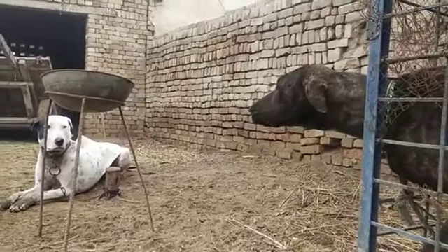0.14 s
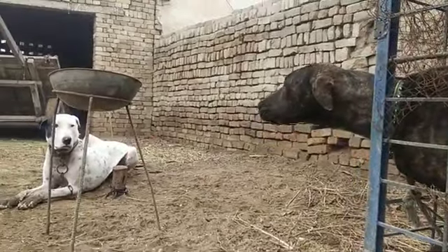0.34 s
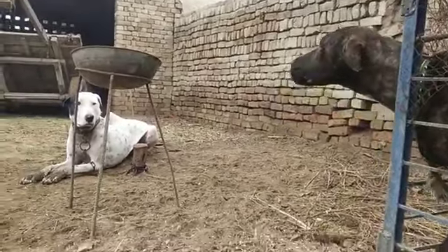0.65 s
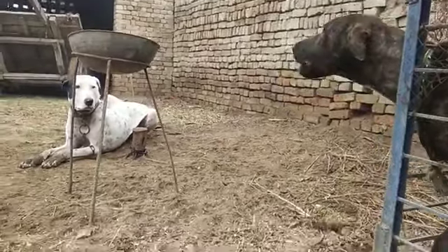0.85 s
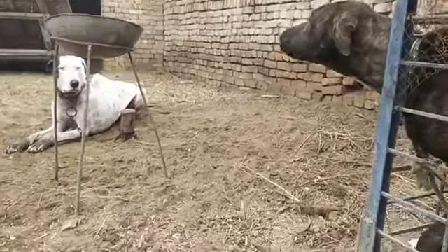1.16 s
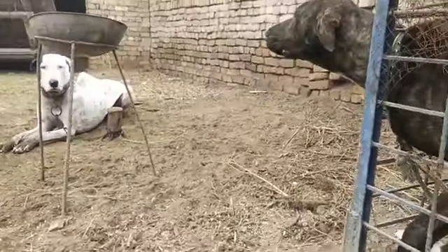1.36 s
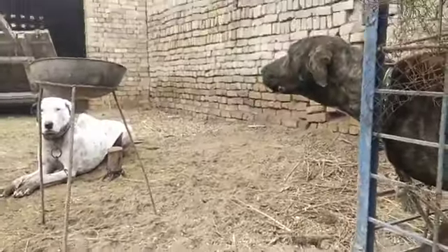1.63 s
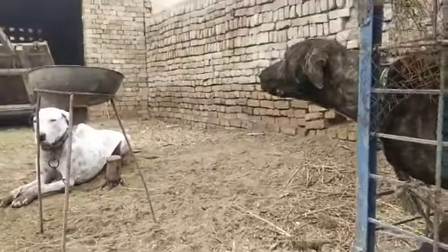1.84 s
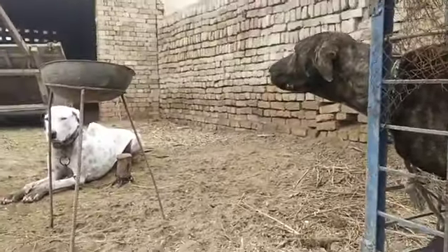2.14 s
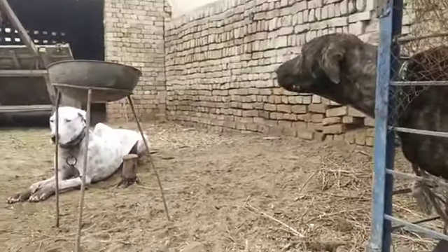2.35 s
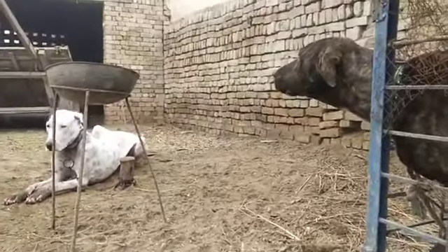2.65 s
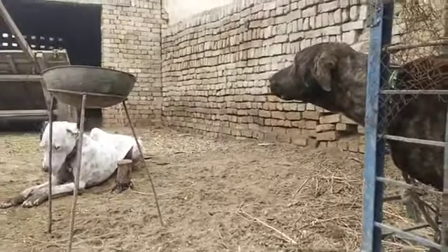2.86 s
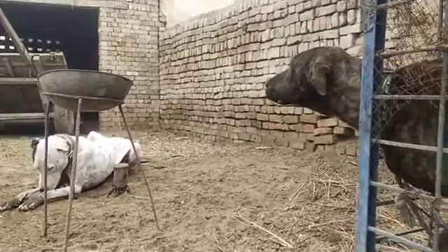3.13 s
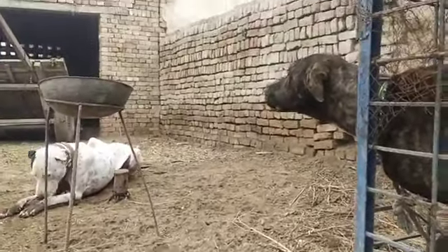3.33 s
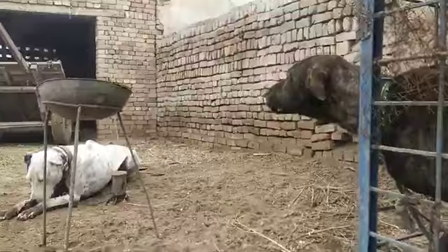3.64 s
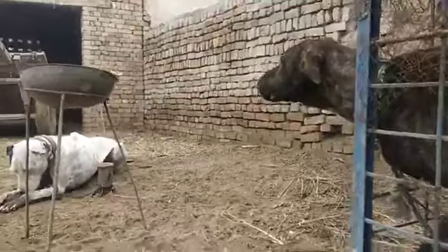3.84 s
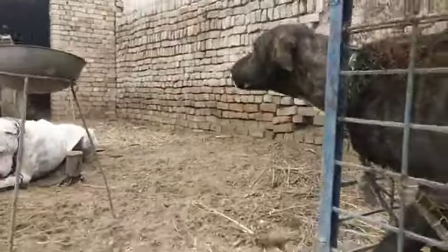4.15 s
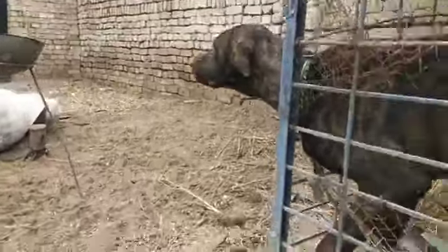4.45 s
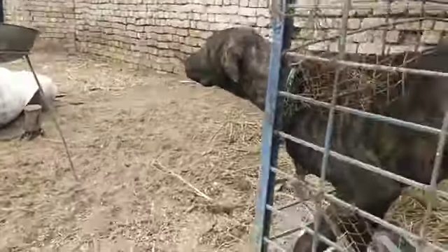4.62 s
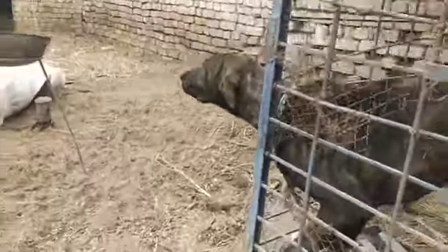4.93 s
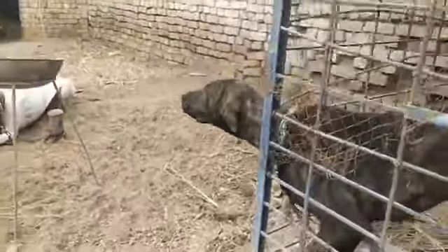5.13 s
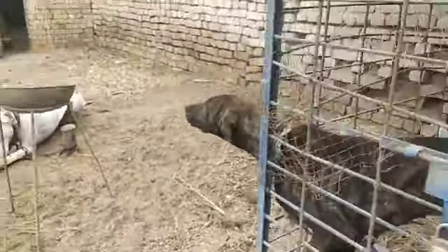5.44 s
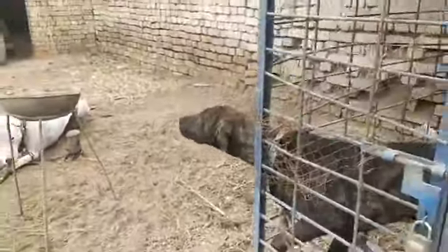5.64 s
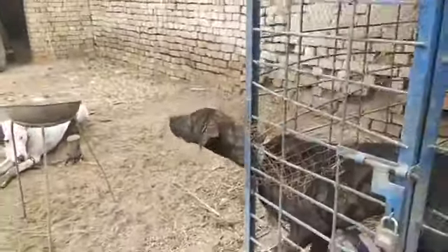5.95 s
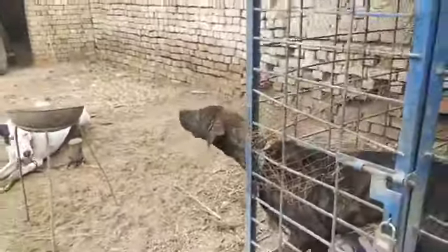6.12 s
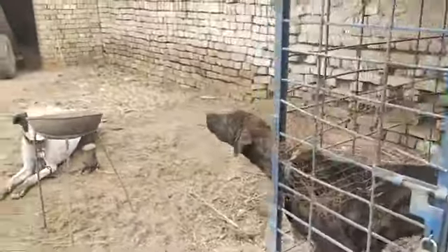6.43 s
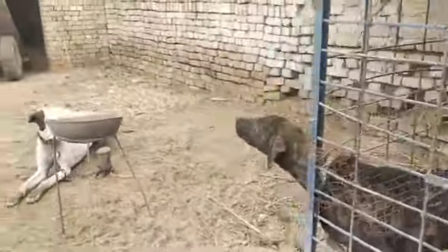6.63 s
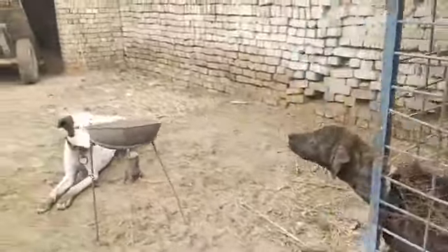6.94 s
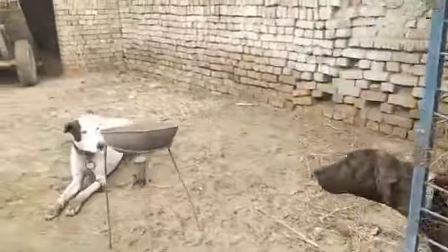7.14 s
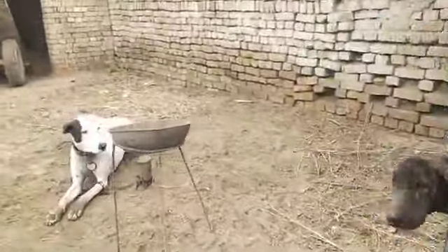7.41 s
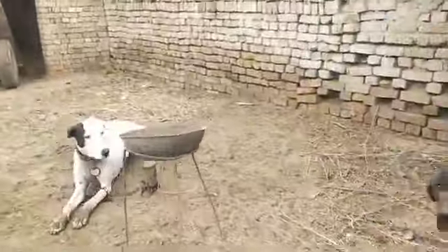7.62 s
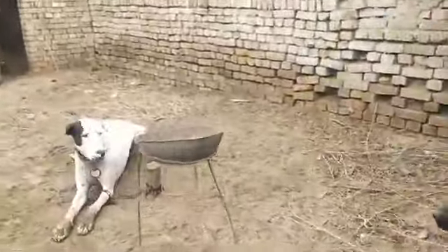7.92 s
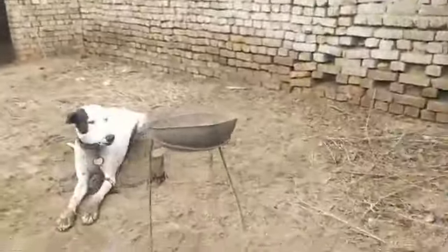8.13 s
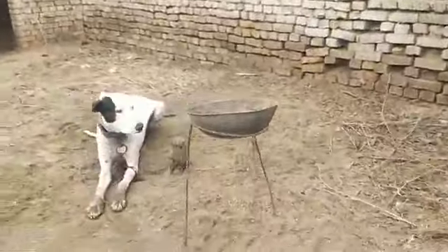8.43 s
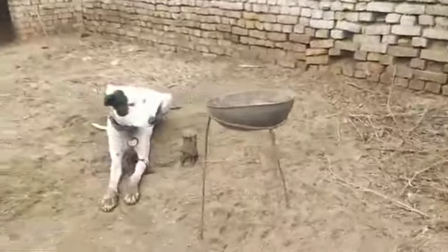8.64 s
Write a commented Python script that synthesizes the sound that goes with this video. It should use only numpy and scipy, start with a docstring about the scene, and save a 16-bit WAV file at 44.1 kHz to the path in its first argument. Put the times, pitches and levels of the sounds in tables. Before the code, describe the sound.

A big dog gives five deep rattling growls in a brick yard while someone shifts on dry straw and a crow caws beyond.

```python
"""A low, rattling growl opens at once: a big dog growls five times in a brick yard, the third time longest.
Each growl is a train of uneven vocal-fold pulses filtered by throat, mouth and muzzle, with slaps of loose flesh.
Someone close by shifts about on dry straw: swelling noise for the clothes, decaying crackles for the feet.
Beyond the wall a crow caws and small birds whistle, as frequency-modulated tones; a faint rattle of
resonant clicks comes near the end. Shaped noise is the air, and decaying noise the echo of the walls."""
import sys
import numpy as np
from scipy import signal
from scipy.fft import rfft, irfft, next_fast_len
from scipy.io import wavfile
from scipy.ndimage import uniform_filter1d

SR = 44100
rng = np.random.default_rng(int(sys.argv[2]) if len(sys.argv) > 2 else 0)


def transcribe(signal):
    """Save signal, clipped to [-1, 1], as a 16-bit WAV file at the path in sys.argv[1]."""
    frames = np.atleast_2d(signal).T
    limited = np.clip(frames, -1, 1)
    pcm = np.round(limited * 32767).astype(np.int16)
    wavfile.write(sys.argv[1], SR, pcm)


N = 387051
TIME = np.arange(N) / SR


def from_db(db):
    """Amplitude ratio: 20 dB is a factor of ten."""
    return 10 ** (np.asarray(db) / 20)


def rms_one(x):
    """Normalisation to unit effective value."""
    return x / np.sqrt(np.mean(x ** 2) + 1e-20)


def cut(x, hz, kind, order=4):
    """Butterworth filtering: a maximally flat pass band."""
    return signal.sosfilt(signal.butter(order, hz, kind, fs=SR, output="sos"), x + 1e-18)


def colour(x, points, causal=True):
    """Spectral shaping by (Hz, dB) points: minimum-phase, or else symmetric in time."""
    size = 2 * next_fast_len(x.shape[-1] // 2 + 4096)
    hz, db = np.transpose(points)
    log_hz = np.log2(np.maximum(np.arange(size // 2 + 1) * SR / size, 1))
    octaves_outside = np.abs(log_hz - np.clip(log_hz, np.log2(hz[0]), np.log2(hz[-1])))
    # past both ends it falls by 24 dB per octave, for two octaves
    gain = from_db(np.interp(log_hz, np.log2(hz), db) - 24 * np.minimum(octaves_outside, 2))
    if causal:
        # folding the cepstrum gives the minimum-phase response
        cepstrum = irfft(np.log(gain))[:size // 2]
        cepstrum[1:] *= 2
        gain = np.exp(rfft(cepstrum, size))
    return irfft(rfft(x, size) * gain)[..., :x.shape[-1]]


def resonance(x, hz, width):
    """Heterodyning: a steep-sided resonance of gain 1 whose centre may move."""
    turn = np.exp(2j * np.pi * np.cumsum(hz * np.ones(len(x))) / SR)
    return 2 * np.real(turn * cut(x / turn, width / 2, "low", order=2))


def curves(rows, t):
    """Linear interpolation of a table's columns at the times t."""
    s, *columns = np.transpose(rows)
    return [np.interp(t, s, c) for c in columns]


def drift(rate, t):
    """Band-limited randomness: chance values of unit spread about 0, rate per second, joined by lines."""
    knots = np.arange(t[0], t[-1] + 1, 1 / rate)
    return np.interp(t, knots, rng.standard_normal(len(knots)))


def even(x):
    """Automatic gain: holds the level near 1 over a few cycles, keeping the single pulses."""
    power = uniform_filter1d(uniform_filter1d(x * x, size=1500), size=1000)
    return x / np.sqrt(np.maximum(power, 0) + np.mean(x * x) / 100)


def pan(x, db):
    """Interaural level difference: left over right in dB, with the sum of the ears kept."""
    left = from_db(db)
    return x * np.vstack([left, np.ones_like(left)]) * 2 / (1 + left)


def stereo_noise(count, alike):
    """Interaural coherence: white noise that is partly the same in both ears."""
    mid, side = rng.standard_normal((2, count))
    alike = np.clip(alike, -1, 1)
    return np.sqrt(1 + alike) * mid + np.sqrt(1 - alike) * side * [[1], [-1]]


def add(out, start, x):
    """Superposition: mixes a sound in at its time in seconds."""
    i = max(round(start * SR), 0)
    out[:, i:i + x.shape[-1]] += x[..., :N - i]


def yard(x, wet_db, t60=0.72, bass_db=-6):
    """Reverberation: brick walls scatter a decaying tail, alike in both ears only in the bass."""
    t = TIME[:SR // 2]
    bass = cut(rng.standard_normal(len(t)), 1100, "low", order=2)
    treble = cut(rng.standard_normal((2, len(t))), 360, "high", order=2)
    scatter = from_db(bass_db) * bass + treble
    fade = from_db(-60 * t / t60) * (t > .004)
    tail = scatter * fade / np.sqrt(np.sum(fade ** 2))
    return x + from_db(wet_db) * signal.fftconvolve(x, tail, axes=1)[:, :N]


# Spectrum of the background. Each row: frequency in Hz, relative level in dB.
AIR_TONE = [(25, -18), (50, -13.5), (90, -1), (130, -2), (172, 1.5), (235, -10), (330, -11), (700, -16),
            (1200, -15.5), (2000, -20.5), (3000, -21), (5200, -29), (7000, -32.5), (15000, -38)]
AIR_DB, HANDLING_DB = -64.5, -1   # steady level; dull handling noise relative to the swish strength


def air(swish_level):
    """Diffuse field: village rumble shared by the ears under an unrelated hush, raised by handling noise."""
    rumble = cut(stereo_noise(N, alike=0.91), 650, "low", order=2)
    hush = cut(stereo_noise(N, alike=0.043), 520, "high", order=2)
    noise = rms_one(colour(rumble + pan(hush, db=1.5), AIR_TONE))
    return noise * np.hypot(from_db(AIR_DB), from_db(HANDLING_DB) * swish_level[1])


# Calls of the crow. Each row: start in seconds, end in seconds, level in dB of the voiced part,
# centre in Hz, warbles per second.
CAWS = [(2.767, 3.079, -50, 1787, 77), (3.557, 3.865, -46, 1806, 74), (6.553, 6.851, -52, 1805, 71)]
# Spectrum of a caw. Each row: frequency in Hz, relative level in dB.
CAW_TONE = [(1000, -10), (1400, -4), (1620, 2.5), (1780, -3.5), (1950, 1), (2150, 1), (2500, -15),
            (3200, -40.5)]
# Whistles of small birds. Each row: start in seconds, end in seconds, first pitch in Hz, last pitch in Hz,
# level in dB, random waver in Hz.
WHISTLES = [(2.444, 2.676, 3560, 3330, -73, 70), (3.159, 3.407, 1800, 3550, -70, 20),
            (3.15, 3.244, 1990, 2340, -63.5, 40.5), (3.233, 3.434, 1570, 2704, -58, 11),
            (3.27, 3.678, 1118, 1077, -67.5, 9.3), (3.385, 3.48, 2584, 2610, -67.5, 22),
            (3.884, 4.037, 2490, 2580, -55.5, 67), (4.341, 4.464, 2140, 2830, -56.5, 25),
            (7.772, 8.001, 1392, 2940, -65.5, 12), (7.851, 7.924, 2600, 2670, -60, 120),
            (7.99, 8.052, 2650, 2760, -53.5, 170), (8.196, 8.36, 2650, 2790, -69, 150),
            (8.27, 8.51, 1400, 2690, -71.5, 17)]
CAW_WARBLE_HZ, CAW_ARCH_HZ, CAW_SAG_HZ = 148, 89.9, 92   # fast warble; rise in the middle; fall over the caw
CAW_OVERTONE_HZ, CAW_OVERTONE_GAIN = 389, 0.46   # a slower buzz adds a band above and below
CAW_RASP = 0.28   # hoarse noise relative to the voice


def birds():
    """Frequency modulation: caws arch and turn hoarse from a fast warble; whistles glide and waver."""
    out = np.zeros((2, N))
    for start, end, db, centre_hz, rate in CAWS:
        t = np.arange(start, end, 1 / SR)
        along = np.linspace(0, 1, len(t))
        cycle = 2 * np.pi * np.cumsum(rate * (1 + .03 * drift(60, t))) / SR
        contour = centre_hz + CAW_ARCH_HZ * (np.sin(np.pi * along) - 1) - CAW_SAG_HZ * (along - .5)
        hz = contour + CAW_WARBLE_HZ * signal.sawtooth(cycle, .5) + 25 * drift(201.5, t)
        buzz = 1 + CAW_OVERTONE_GAIN * np.cos(2 * np.pi * CAW_OVERTONE_HZ * t)
        voice = np.sin(2 * np.pi * np.cumsum(hz) / SR) * buzz * (1 + 0.36 * np.sin(cycle))
        rasp = rms_one(colour(rng.standard_normal(len(t)), CAW_TONE))
        caw = rms_one(colour(voice, CAW_TONE)) + CAW_RASP * rasp
        add(out, start, pan(caw * from_db(db) * signal.windows.tukey(len(t), .6), db=12.0))
    for start, end, from_hz, to_hz, db, waver_hz in WHISTLES:
        count = round((end - start) * SR)
        hz = np.linspace(from_hz, to_hz, count) + waver_hz * drift(220, TIME[:count])
        tone = np.sin(2 * np.pi * np.cumsum(hz) / SR)
        add(out, start, pan(tone * from_db(db) * signal.windows.tukey(count, .7), db=15.5))
    return out


# Dry hollow clicks. Each row: time in seconds, peak in dB before panning.
RATTLE = [(8.0716, -54), (8.095, -50), (8.129, -56), (8.1506, -52), (8.188, -48), (8.209, -49),
          (8.4689, -53), (8.4918, -52.5), (8.5272, -56), (8.5497, -48.5), (8.584, -51), (8.607, -50)]
# Spectrum of a click, with two hollow resonances. Each row: frequency in Hz, relative level in dB.
RATTLE_TONE = [(900, -24), (1500, -13), (1820, 0), (2200, -14), (2630, 5), (3200, -13), (4000, -15),
               (5500, -15), (7500, -21.5)]


def rattle(t60=0.038, grit=0.19):
    """Impulse excitation: small dry clicks ring in two hollow resonances."""
    out, t = np.zeros((2, N)), TIME[:SR // 20]
    for s, db in RATTLE:
        rough = grit * rng.standard_normal(len(t)) * from_db(-60 * t / t60)
        click = colour(signal.unit_impulse(len(t)) + rough, RATTLE_TONE)
        add(out, s, pan(click / np.abs(click).max() * from_db(db), db=19.0))
    return out


# Movements of the clothes. Each row: peak time in seconds, swell in seconds, fade in seconds,
# relative swish level in dB, relative hiss level in dB, left over right in dB.
MOVES = [(.65, 0.054, 0.33, -53.5, -66, 11), (.97, 0.27, 0.23, -61, -56.5, 9.5),
         (1.54, 0.77, 0.49, -56, -55, 13.5), (1.84, 0.33, 0.46, -53, -81, 16.5),
         (2.459, 0.023, 0.045, -60, -67, 18), (3.99, 0.5, .16, -53.5, -89.5, 9),
         (4.05, 0.13, 0.53, -46.5, -82, 10.5), (4.35, 0.15, 0.77, -56, -79, 15),
         (5.41, 0.35, 0.39, -53.5, -79, 4), (5.671, 0.11, 0.22, -58, -57, 3),
         (5.8, 0.047, 0.15, -65, -58.5, -1), (6.12, 0.2, 0.39, -62.5, -78, 4),
         (6.65, 0.44, 0.31, -64, -101, 7.5), (7.227, 0.086, 0.021, -51, -69, -3),
         (7.35, 0.15, 0.044, -49, -63, -1), (7.5, 0.63, 0.21, -51, -89, 4),
         (7.73, 0.22, 0.047, -57, -57, 0), (7.97, 0.66, 0.091, -59, -67, 5.5),
         (8.29, 0.31, 0.1, -58.5, -67.5, 1.5), (8.58, 0.24, 1, -61, -71.5, 8.5)]
MOVE_FALL_DB, MOVE_ROUNDNESS = 16.5, 1.42   # drop over one swell or fade time, and its curvature
SHEEN_DB, SHEEN_LOSS_DB_PER_S = -5, 9.5   # quick movements hiss brighter above 10 kHz than drawn-out ones


def movement():
    """Energy summation of strokes that swell and fade: strength of swish, hiss and sheen in both ears."""
    t, power = TIME[::100], 0
    for s, swell_s, fade_s, swish_db, hiss_db, side_db in MOVES:
        away = np.maximum((s - t) / swell_s, (t - s) / fade_s)
        stroke = pan(from_db(-MOVE_FALL_DB * away ** MOVE_ROUNDNESS), side_db)
        sheen_db = hiss_db + SHEEN_DB - SHEEN_LOSS_DB_PER_S * (swell_s + fade_s)
        layers = np.array([stroke * from_db(db) for db in (swish_db, hiss_db, sheen_db)])
        power = power + layers ** 2
    return np.array([[np.interp(TIME, t, ear) for ear in layer] for layer in np.sqrt(power)])


# Spectrum of the swish of cloth. Each row: frequency in Hz, relative level in dB.
SWISH_TONE = [(500, -21), (1000, -27.5), (1600, 1.5), (2100, 6), (2700, 4.5), (3350, -1.5), (3700, 0),
              (4300, -7.5), (5200, -14), (5800, -26.5), (6500, -14.5)]
# Spectrum of the finer hiss above it. Each row: frequency in Hz, relative level in dB.
HISS_TONE = [(4500, -5.5), (5300, -6), (5850, -12), (6900, -0.5), (8200, -5.5), (10000, -7), (12000, -1.5),
             (15000, 1.5)]
# How much the feet tread on the straw. Each row: time in seconds, share from 0 to 1.
TREADING = [(2, 0.27), (5.3, 0.65), (7.5, 1), (7.75, 0.74), (8.0, 0.53)]


def clothes(swish_level, hiss_level, sheen_level, swish_db=-8.0, hiss_db=3.0, grain_db=1.0, flutter_db=4.0):
    """Sliding friction: cloth on cloth makes a swish with a fine, grainy hiss above it."""
    swish = colour(stereo_noise(N, alike=0.01), SWISH_TONE)
    swish = swish / np.std(cut(swish, [2600, 5000], "band"))
    hiss = rms_one(colour(stereo_noise(N, alike=0.044), HISS_TONE))
    low_hiss = cut(hiss, 10000, "low", order=5) * hiss_level
    sheen = cut(hiss, 10000, "high", order=5) * sheen_level
    flutter = flutter_db * curves(TREADING, TIME)[0] * drift(30, TIME)
    grain = from_db(grain_db * drift(400, TIME) + flutter)
    return grain * (swish * swish_level * from_db(swish_db) + (low_hiss + sheen) * from_db(hiss_db))


# Tight rubs of cloth. Each row: peak time in seconds, half length in seconds at half amplitude,
# centre in Hz, width in Hz, level in dB at the peak.
RUBS = [(1.653, 0.39, 3570, 695, -59.5), (4.009, 0.064, 6860, 1070, -62), (4.748, 0.28, 2190, 615, -63.5),
        (5.42, 0.25, 1650, 199, -61)]


def rubs():
    """Band-limited friction: cloth rubbing tightly hisses in a narrow band that swells and fades."""
    out = np.zeros((2, N))
    for s, half_s, hz, width, db in RUBS:
        count = round(4 * half_s * SR)
        noise = stereo_noise(count, alike=0.078)
        band = rms_one(cut(noise, [hz - width / 2, hz + width / 2], "band", order=2))
        add(out, s - 2 * half_s, pan(band * signal.windows.hann(count) * from_db(db), db=6.0))
    return out


# Spectrum of crunching straw. Each row: frequency in Hz, relative level in dB.
SCUFF_TONE = [(350, -5.5), (600, -6.5), (744, -8), (1280, -11.5), (1460, -8), (2020, -16), (2220, -11.5),
              (3650, -7), (4400, -12), (5690, -22.5), (6690, -17.5), (15000, -40.5)]
TICKS_PER_S = 11
TICK_LEAST_DB, TICK_RANGE_DB = 5, 16   # tick peak relative to the swish strength, before the treading share


def straws(swish_level, t60=0.037):
    """Random brittle fracture: single straws crack underfoot, louder the stronger the movement."""
    out, t = np.zeros((2, N)), TIME[:SR // 20]
    for when, size in rng.random((round(TICKS_PER_S * N / SR), 2)):
        i = int(when * (N - 1))
        tick = colour(stereo_noise(len(t), alike=0.12) * from_db(-60 * t / t60), SCUFF_TONE)
        strength = swish_level[:, i:i + 1] * from_db(TICK_LEAST_DB + TICK_RANGE_DB * size)
        add(out, TIME[i], tick / np.abs(tick).max() * strength)
    return out * curves(TREADING, TIME)[0]


# Scuffs and snaps of straw. Each row: start in seconds, relative level in dB, decay by 60 dB in seconds,
# left over right in dB.
SCUFFS = [(0.6, -40.5, 0.17, 3), (2.12, -42, 0.027, 8), (2.207, -44, 0.035, 7), (2.441, -49.5, 0.057, 24),
          (3.578, -49, 0.16, 21), (4.031, -37, 0.26, 16), (4.079, -42, 0.052, 13),
          (4.269, -38.5, 0.063, 11), (4.36, -40, 0.061, 9), (4.68, -41, 0.074, 7), (5.374, -36, 0.14, 1),
          (5.707, -41, 0.43, 0), (5.799, -38, 0.6, 0), (5.84, -32.5, 0.093, 4), (5.985, -33.5, 0.21, 0.5),
          (6.124, -38.5, 0.11, 2), (7.358, -28.5, 0.16, 1), (7.466, -47, 0.63, -2), (7.61, -41, 0.37, 12),
          (7.7, -40.5, 0.39, 2), (7.76, -39.5, 0.084, -2), (8.007, -47, 0.2, 1)]
# Soft footfalls and bumps. Each row: start in seconds, relative peak in dB, centre in Hz,
# decay by 60 dB in seconds.
BUMPS = [(2.126, -49, 119, 0.057), (2.437, -46, 172, 0.044), (4.08, -32.5, 1600, 0.034),
         (4.677, -37, 129, 0.02), (5.529, -45, 415, 0.55), (5.651, -38, 410, 0.13),
         (5.776, -28.5, 570, 0.089), (5.808, -36.5, 810, 0.11), (6.282, -41, 376, 0.095),
         (6.298, -37, 250, 0.15), (6.373, -47.5, 352, 0.083), (6.474, -39.5, 395, 0.013),
         (7.455, -37.5, 480, 0.25), (7.509, -35.5, 480, 0.039), (7.597, -39, 177, 0.088),
         (8.274, -42, 484, 0.015)]


def feet(crunch_db=-9, snap_db=-10, bump_db=-1.5, crackle_db=1.5):
    """Transient excitation: straw snaps and crunches in dying crackles; weight lands with a dull bump."""
    out, t = np.zeros((2, N)), TIME[:SR // 4]
    snap = cut(signal.unit_impulse(len(t)), 2500, "high", order=1) * from_db(snap_db)
    for s, db, t60, side_db in SCUFFS:
        crackle = stereo_noise(len(t), alike=0.47) * from_db(crackle_db * drift(670, t))
        crunch = rms_one(colour(crackle, SCUFF_TONE)) * from_db(crunch_db - 60 * t / t60)
        add(out, s, pan((crunch + snap) * from_db(db), side_db))
    for s, db, hz, t60 in BUMPS:
        decay = stereo_noise(len(t), alike=0.84) * from_db(-60 * t / t60)
        thud = cut(decay, [hz * 0.69, hz * 1.39], "band", order=2)
        add(out, s, thud / np.abs(thud).max() * from_db(db + bump_db))
    return out


def pulses(t, pitch, rough, jitter):
    """Jitter: sample index of each fold closure, thrown off the beat by roughness."""
    beats = np.flatnonzero(np.diff(np.floor(np.cumsum(pitch) / SR)))
    slip = jitter * rough[beats] * rng.standard_normal(len(beats)) * SR / pitch[beats]
    return np.clip(beats + slip, 0, len(t) - 1).astype(int)


def strikes(at, count, spread_db, breath, puff_s=0.028):
    """Shimmer and turbulence: closures of uneven force, each followed by a puff of noisy air."""
    clicks = np.zeros(count)
    clicks[at] = from_db(spread_db * np.clip(rng.standard_normal(len(at)), -2, 2))
    r = np.exp(-1 / (puff_s * SR))
    puffs = signal.lfilter([np.sqrt(1 - r * r)], [1, -r], clicks + 1e-18)
    return clicks + breath * puffs * rng.standard_normal(count)


def hum(pitch, throat):
    """Harmonic series: the three lowest partials of folds that swing evenly."""
    phase = 2 * np.pi * np.cumsum(pitch) / SR
    hz, db = np.transpose(throat)
    return sum(from_db(np.interp(k * pitch, hz, db)) * np.cos(k * phase) for k in range(1, 4))


# Resonances of the muzzle. Each row: centre in Hz at rest, width in Hz, relative level in dB at rest.
MUZZLE = [(1570, 230, 14), (2310, 410, -2), (3380, 90, 5.5), (4140, 550, 4.5), (5640, 960, -4)]
SNARL_DB_PER_HZ = 0.3   # lips drawn back raise the first resonance and strengthen the second


def muzzle(x, lips_hz, nose_db):
    """Formants: the lips move the lowest two resonances, the nose sets the level of the rest."""
    rest_hz = MUZZLE[0][0]
    out, snarl_db = 0, SNARL_DB_PER_HZ * (lips_hz - rest_hz)
    for k, (hz, width, db) in enumerate(MUZZLE):
        centre = hz * (lips_hz / rest_hz) ** (1 / (k + 1)) if k < 2 else hz
        level_db = db + snarl_db * (k == 1) + nose_db * (k > 1)
        out = out + resonance(x, centre, width) * from_db(level_db)
    return out


# Hard slaps of loose flesh in the throat. Each row: time in seconds, peak in dB in the mouth,
# peak in dB at the teeth, decay of the rasp in ms.
SLAPS = [(.005, -24, -37, 6.6), (0.053, -23, -46, 5), (0.117, -21, -40, 3.2), (.155, -26.5, -45, 2.2),
         (.186, -24, -42, 3), (0.224, -23.5, -51, 4), (.265, -20, -35.5, 7.6), (.295, -21, -40, 1.9),
         (.335, -23, -35.5, 5), (.376, -22, -38, 2.8), (.416, -23.5, -43.5, 3.1), (.458, -24, -38.5, 4.7),
         (0.488, -30, -48, 2.2), (.688, -35, -44, 7), (.709, -41, -36, 7.2), (.732, -50, -52, 5.8),
         (.767, -39, -38, 7.3), (0.79, -35, -38, 7), (0.809, -31, -41, 5.7), (.833, -30, -36.5, 14),
         (0.946, -20.5, -33, 13), (.96, -28, -30, 8.8), (1.006, -24, -32.5, 11), (1.04, -28, -35.5, 11.8),
         (1.078, -29, -35, 8.6), (1.141, -27, -49, 2.6), (1.171, -28, -46, 1.97), (1.21, -27.5, -50, 2),
         (2.74, -33.5, -61, 1.9), (2.815, -32, -56, 2), (3.048, -32, -46, 2.7), (3.125, -32.5, -52, 2.33),
         (3.17, -31, -50.5, 1.8), (3.25, -31.5, -53, 1.8), (3.296, -32, -52, 2), (6.984, -32, -66, 1.4),
         (7.007, -28.5, -56, 1.3), (7.094, -40, -57, 2), (7.129, -41, -47, 40), (7.152, -40.5, -44, 11.6),
         (7.27, -17.5, -51, 14)]
# Runs of softer flutter. Each row: first time in seconds, last time in seconds, period in seconds,
# mean peak in dB in the mouth, mean peak in dB at the teeth.
FLAP_RUNS = [(3.34, 3.584, .048, -36.5, -52), (3.696, 3.959, .043, -36.5, -50),
             (4.003, 4.324, .045, -39.5, -55), (7.292, 7.336, .024, -23, -57)]
FLAP_SPREAD_DB, FLAP_SLIP_S, FLUTTER_RASP_MS = 2, 0.00094, 2   # random force and timing; rasp decay


def flaps(start, end):
    """Flow-induced flutter: slaps and nearly regular runs in a growl, as rows like those of SLAPS."""
    yield from (row for row in SLAPS if start <= row[0] < end)
    for first, last, period, slap_db, snap_db in FLAP_RUNS:
        if start <= first < end:
            for s in np.linspace(first, last, round((last - first) / period) + 1):
                slip, force = rng.standard_normal(2)
                force_db = FLAP_SPREAD_DB * force
                yield s + FLAP_SLIP_S * slip, slap_db + force_db, snap_db + force_db, FLUTTER_RASP_MS


ONSET_DB = 20   # a growl rises from, and dies to, this far below its course
TEETH_FOLLOWS, TEETH_DB_PER_OCTAVE = 0.68, 12   # the teeth buzz grows with the mouth's level and with pitch
LIPS_RELAX_S = 0.47   # lips are drawn back at the start of a growl, or at its height, then relax
GAPE_HZ, GAPE_WIDTH_HZ, GAPE_GAIN, GAPE_S = 1146, 286, 3.06, 0.075   # the mouth gapes briefly
FLAP_RASP, FLAP_SOFT_HZ = .12, 2300   # rasp of air after a slap; soft flesh makes its snap dull


def growl(rows, throat, attack_s, release_s, lips_hz, drawn_hz, chest_spread_db, mouth_spread_db, breath,
          chest_db, mouth_db, teeth_db, jaw_gain=0.66, jaw_width=200, choke_db=-9, draw_s=None, gape_s=None,
          nose_db=0.0):
    """Source and filter: fold pulses sound through chest, mouth and bared teeth; loose flesh adds slaps."""
    t = np.arange(rows[0][0], rows[-1][0], 1 / SR)
    pitch, rough, chest_level, mouth_level, jaw_hz = curves(rows, t)
    attack = np.maximum(1 - (t - t[0]) / attack_s, 0)
    release = np.maximum(1 - (t[-1] - t) / release_s, 0)
    edges_db = -ONSET_DB * (attack ** 2 + release ** 2)
    lips = lips_hz + drawn_hz * np.exp(-np.abs(t - (draw_s or t[0])) / LIPS_RELAX_S)
    at = pulses(t, pitch, rough, jitter=.19)

    # each puff of air swells and fades smoothly, so the chest is filtered forwards and backwards
    flow = colour(strikes(at, len(t), chest_spread_db, breath=0.077), throat, causal=False)
    chest = cut(cut(flow, 380, "low")[::-1], 380, "low")[::-1]
    # where the growl is smooth, a clean hum takes over in the chest
    clear = np.clip(.85 - 1.3 * rough, 0, 1)
    chest = (1 - clear) * even(chest) + clear * even(hum(pitch, throat))
    chest = even(chest) * from_db(chest_level + chest_db)

    # the sharpness of a closure has its own spread, apart from the volume of air
    sharp = strikes(at, len(t), mouth_spread_db, breath)
    mouth = cut(colour(sharp, throat), 317, "high")
    gape = 0 if gape_s is None else GAPE_GAIN * np.exp(-((t - gape_s) / GAPE_S) ** 2)
    jaw_part = jaw_gain * resonance(mouth, jaw_hz, jaw_width)
    gape_part = gape * resonance(mouth, GAPE_HZ, GAPE_WIDTH_HZ)
    mouth = even(mouth + jaw_part + gape_part) * from_db(mouth_level + mouth_db)

    teeth_level = (teeth_db + TEETH_FOLLOWS * (mouth_level - mouth_level.mean())
                   + TEETH_DB_PER_OCTAVE * np.log2(pitch / pitch.mean()))
    hissing = sharp + 0.35 * rng.standard_normal(len(t))
    teeth = even(muzzle(hissing, lips, nose_db)) * from_db(teeth_level)

    out, choked, click = np.zeros((2, N)), np.zeros(len(t)), signal.unit_impulse(SR // 20)
    for s, slap_db, snap_db, rasp_ms in flaps(t[0], t[-1]):
        # the flesh blocks the airway for a moment, then bursts open
        choked = np.maximum(choked, np.exp(-((t - s + .004) / .007) ** 2))
        rasp_fade = np.exp(-1000 * TIME[:len(click)] / rasp_ms)
        burst = click + FLAP_RASP * rng.standard_normal(len(click)) * rasp_fade
        slap = cut(colour(-3 * click - burst, throat), 470, "high", order=2)
        snap = muzzle(cut(burst, FLAP_SOFT_HZ, "low", order=2), np.interp(s, t, lips), nose_db)
        slap = slap / np.abs(slap).max() * from_db(slap_db)
        snap = snap / np.abs(snap).max() * from_db(snap_db)
        add(out, s, slap + snap)
    voice = pan(chest, db=0.67) + (mouth + pan(teeth, db=0.5)) * from_db(choke_db * choked)
    add(out, t[0], voice * from_db(edges_db) * signal.windows.tukey(len(t), .02))
    return out


# Courses of the five growls. Each row: time in seconds, pitch in Hz, roughness from 0 to 1,
# relative chest level in dB, relative mouth level in dB, jaw resonance in Hz.
RATTLING = [(0, 118.1, 0.52, -33.5, -40, 508), (.05, 108.7, .12, -29.5, -44, 640),
            (.12, 106.1, 0.37, -31.5, -44, 715), (.27, 104.9, 0.33, -31.5, -43.5, 740),
            (.35, 98.63, 0.2, -29.5, -45.5, 820), (.42, 97.7, 0.15, -30, -42.5, 747),
            (.48, 101, 0.4, -35, -50, 720), (.56, 101, 0.3, -31.5, -40.5, 583),
            (.67, 94.8, 0.82, -41, -54, 520)]
OPEN = [(.66, 96.4, 0.78, -41.5, -63, 450), (.71, 91.16, 0.72, -34, -42.5, 460),
        (.765, 95.5, 1, -37, -32.5, 546), (.83, 98.1, 0.79, -36.5, -35.5, 620),
        (.9, 106.1, 0.35, -35, -40, 507), (.955, 106.9, 0.12, -37, -31.5, 470),
        (1.05, 105.5, 0.19, -36.5, -39, 477), (1.27, 99.3, 0.11, -40.5, -45.5, 535),
        (1.32, 90.5, 0.52, -47, -49.5, 465), (1.355, 91.4, 0.27, -55, -76, 477),
        (1.45, 90.3, 0.09, -50, -69, 480)]
LOW = [(2.46, 77.3, 0.17, -49, -65, 690), (2.535, 91.6, 0.32, -39, -57, 705),
       (2.7, 88.96, 0.27, -39, -54.5, 666), (2.78, 95.96, 0.26, -36.5, -52, 635),
       (3.05, 92.14, 0.28, -36.5, -47.5, 643), (3.25, 87.7, 0.38, -37, -46, 656),
       (3.55, 92.87, 0.37, -38.5, -53.5, 640), (3.9, 91.7, 0.23, -42.5, -59, 689.5),
       (4.24, 88.2, 0.25, -44.5, -58.5, 794), (4.42, 81.8, 1, -51.5, -67, 723.5)]
SHORT = [(5.14, 90.1, 0.29, -48, -58.5, 472), (5.215, 109.3, 0.4, -32.5, -46.5, 520),
         (5.3, 119.8, 0.54, -32.5, -40, 563), (5.37, 114, 0.93, -48, -52, 564)]
SWELLING = [(6.67, 94.5, 0.9, -48, -58, 470), (6.76, 102.1, 0.13, -44, -47, 450),
            (6.84, 100.5, 0.67, -46, -53.5, 420), (6.91, 103.5, 0.52, -46, -43.5, 410),
            (6.95, 107.7, 0.43, -46, -37.5, 400), (7.025, 110, 0.36, -45, -31, 465),
            (7.07, 112.9, 0.74, -45.5, -41, 490), (7.115, 119.9, 0.44, -42.5, -33, 507),
            (7.15, 151.5, 0.35, -42, -43.5, 490), (7.22, 153.6, 0.43, -41, -33, 490),
            (7.27, 142, 0.33, -42, -29.5, 504), (7.345, 118.2, 0.63, -40, -28.5, 470),
            (7.415, 95.5, 0.55, -44, -54, 460)]
# Throat and mouth shape in each growl. Each row: frequency in Hz, relative level in dB.
RATTLING_THROAT = [(60, -16.5), (95, -6), (140, 7), (200, 8), (260, -7.5), (320, -8), (400, -5), (480, -8),
                   (550, -11.5), (770, -10.5), (920, -18), (1100, -25), (1300, -35)]
OPEN_THROAT = [(60, -40), (95, -7), (140, 5), (205, 0.5), (270, -4), (360, -7), (435, 5.5), (510, -0.5),
               (620, 1), (760, -6.5), (950, -17.5), (1130, -24), (1350, -26)]
LOW_THROAT = [(60, -14.5), (88, 1.5), (130, 7.5), (185, 3), (240, -4.5), (300, -3), (410, -18.5),
              (520, -11), (660, -12.5), (770, -10), (880, -24), (1050, -46.5)]
SHORT_THROAT = [(60, -12), (100, 3), (150, 4), (190, 6.5), (340, -4.5), (440, -6), (550, -8.5), (670, -17),
                (780, -16), (950, -24.5), (1150, -34)]
SWELLING_THROAT = [(60, -14.5), (95, -2.5), (150, 2.5), (210, 0.5), (300, -3.5), (410, -2), (500, 0.5),
                   (560, -2.5), (670, -18), (800, -13.5), (900, -13.5), (1080, -48), (1300, -29),
                   (1550, -33.5)]


def dog():
    """Interaural delay: five growls, each with its own throat and lips, reach the left ear first."""
    rattling = growl(RATTLING, RATTLING_THROAT, attack_s=0.0042, release_s=0.011, lips_hz=1496, drawn_hz=137,
                     gape_s=.03, chest_spread_db=4.5, mouth_spread_db=-0.5, breath=0.25,
                     chest_db=-0.5, mouth_db=4.5, teeth_db=-54)
    opened = growl(OPEN, OPEN_THROAT, attack_s=0.015, release_s=0.12, lips_hz=1223, drawn_hz=427,
                   draw_s=0.727, gape_s=1.0, nose_db=-10, chest_spread_db=4.0, mouth_spread_db=0.5,
                   breath=0.28, chest_db=-0.5, mouth_db=2.5, teeth_db=-57.5, jaw_gain=0.97)
    low = growl(LOW, LOW_THROAT, attack_s=0.042, release_s=0.11, lips_hz=1474, drawn_hz=30,
                chest_spread_db=5.0, mouth_spread_db=4.0, breath=0.27,
                chest_db=-0.7, mouth_db=3.0, teeth_db=-73.0, nose_db=-10)
    short = growl(SHORT, SHORT_THROAT, attack_s=0.019, release_s=0.1, lips_hz=1570, drawn_hz=20,
                  chest_spread_db=1.0, mouth_spread_db=5.0, breath=0.38,
                  chest_db=-7.0, mouth_db=3.0, teeth_db=-81)
    swelling = growl(SWELLING, SWELLING_THROAT, attack_s=0.038, release_s=0.054, lips_hz=1480, drawn_hz=180,
                     draw_s=7.2, gape_s=7.27, nose_db=-10, chest_spread_db=7.0, mouth_spread_db=-0.5,
                     breath=0.22, chest_db=2.5, mouth_db=2.0, teeth_db=-70.5)
    left, right = rattling + opened + low + short + swelling
    lag_s = .00008
    return np.vstack([left, np.interp(TIME - lag_s, TIME, right)])


def scene():
    """Direct and reflected sound: dog, feet, rattle and birds echo off walls; the rest is dry."""
    swish_level, hiss_level, sheen_level = movement()
    background = air(swish_level)
    calls = yard(birds(), wet_db=-7, t60=.5)
    ground = yard(feet() + rattle(), wet_db=-12.5)
    close = clothes(swish_level, hiss_level, sheen_level) + rubs() + straws(swish_level)
    growls = yard(dog(), wet_db=-10, t60=.3, bass_db=-5)
    return background + calls + ground + close + growls


CUTOFF_HZ = 15100


def record(dry):
    """Band limiting: an elliptic low-pass cuts the top steeply."""
    return signal.sosfilt(signal.ellip(12, .1, 80, CUTOFF_HZ, fs=SR, output="sos"), dry)


dry = scene()
out = record(dry)
transcribe(out)
```